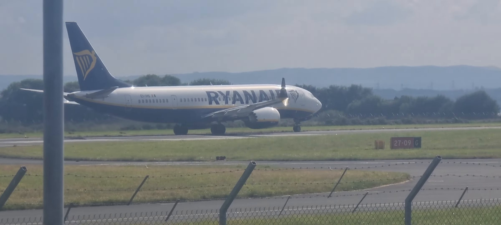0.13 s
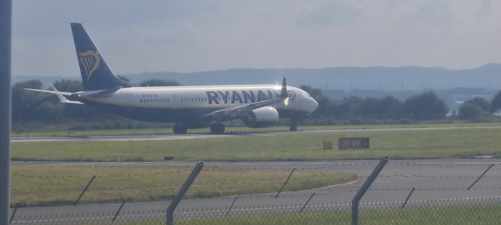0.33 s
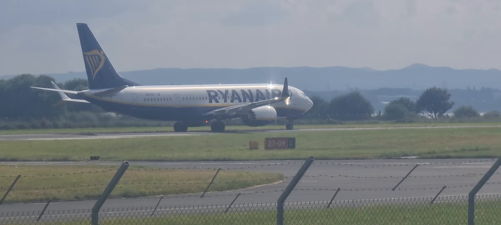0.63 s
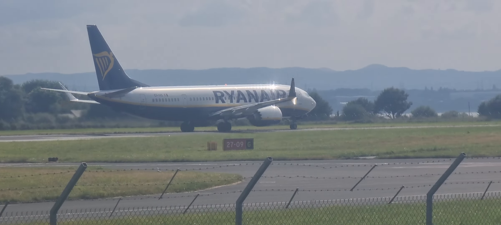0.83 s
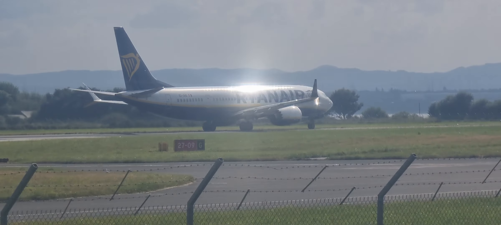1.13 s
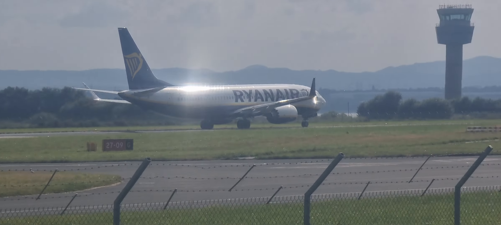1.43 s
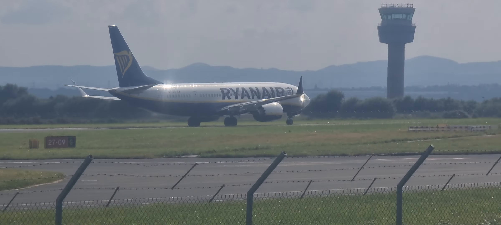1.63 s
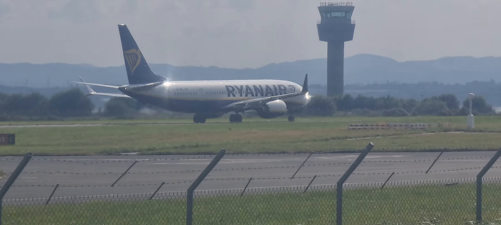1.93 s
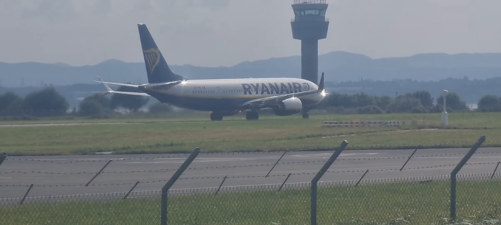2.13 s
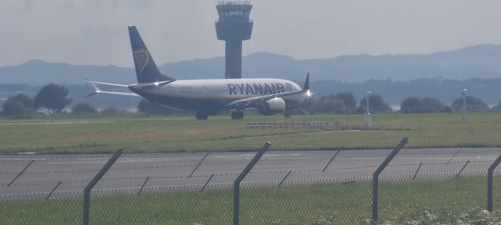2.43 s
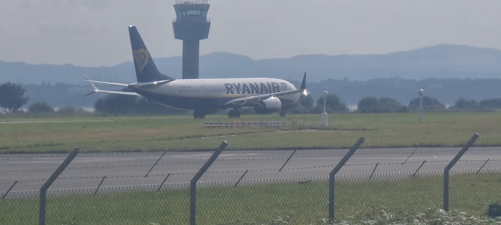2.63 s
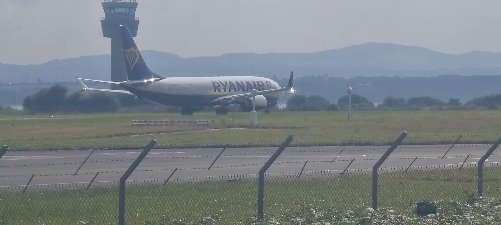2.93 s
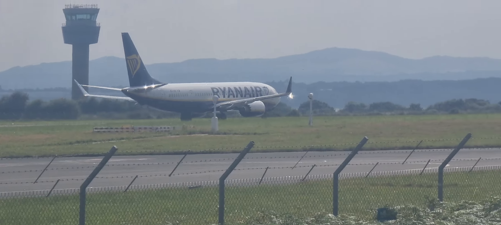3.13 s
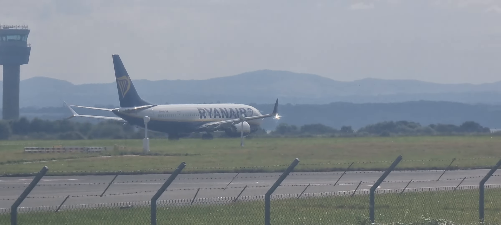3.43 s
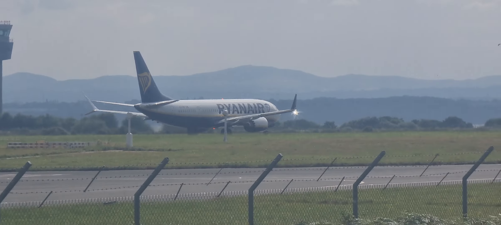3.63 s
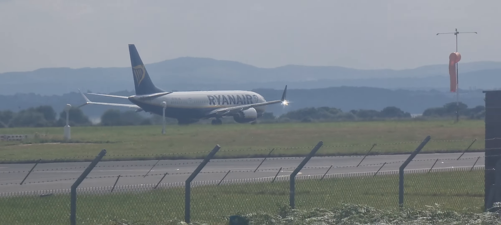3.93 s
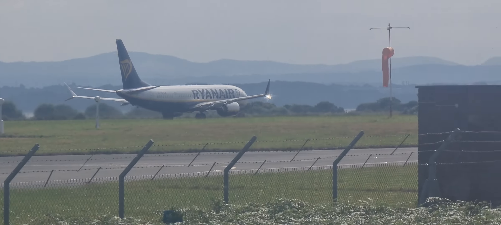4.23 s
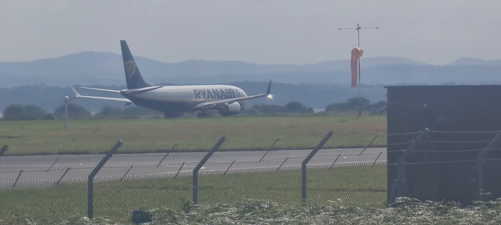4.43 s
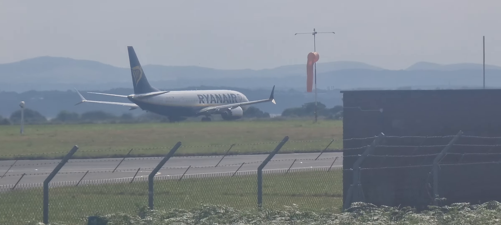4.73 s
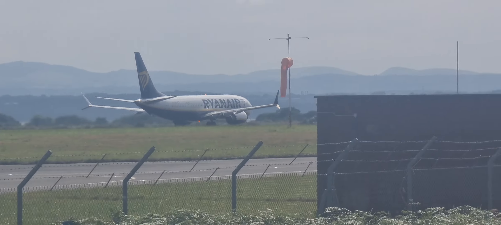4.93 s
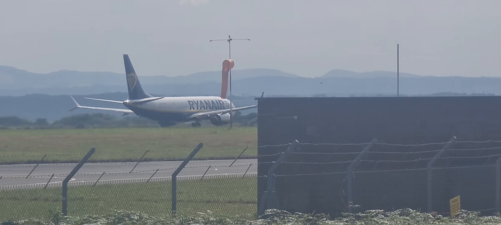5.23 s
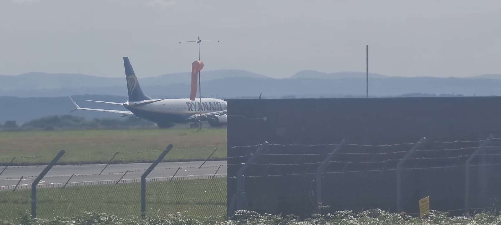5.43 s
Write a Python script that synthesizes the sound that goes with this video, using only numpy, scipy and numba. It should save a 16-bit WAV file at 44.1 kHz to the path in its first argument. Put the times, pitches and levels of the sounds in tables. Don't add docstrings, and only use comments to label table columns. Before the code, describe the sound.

A jet airliner's deep, tearing roar fades down a runway, with a faint airy whine, three small button clicks with thumps, and late wind knocks.

```python
import sys
import numpy as np
from scipy import signal
from scipy.fft import rfft, irfft, next_fast_len
from scipy.io import wavfile
from scipy.ndimage import uniform_filter1d, minimum_filter1d
from numba import njit

SR = 44100
rng = np.random.default_rng(int(sys.argv[2]) if len(sys.argv) > 2 else 0)


def wav_out(sig):
    wavfile.write(sys.argv[1], SR, np.round(np.clip(np.atleast_2d(sig).T, -1, 1) * 32767).astype(np.int16))


def invert_db(x):
    u = np.asarray(x, float) / 20
    return 10 ** u


N = 246519

# press_s, press_tick_db, held_s, release_rattle_db, thump_db
BUTTON_PRESSES = [
    (1.2322, -42, .157, -41.5, 10),
    (2.1227, -41.5, .135, -44, 12.5),
    (3.5026, -52, .155, -39, 10.5),
]


def colour(table, hz):
    at, value = np.transpose(table)
    return np.interp(np.log(hz), np.log(at), value)


def bumps(rows):
    t = np.arange(N) / SR
    return sum(db * np.exp(-2 * ((t - s) / (length / 2)) ** 2) for s, length, db in rows)


def walk(rate_hz):
    hold = int(SR / rate_hz)
    steps = np.repeat(rng.standard_normal(N // hold + 1), hold)
    x = uniform_filter1d(uniform_filter1d(steps, hold), hold)[:N]
    return x / x.std()


def engines():
    # pitch_hz, level_db_per_hz
    roar_spectrum = [(60, -65.5), (130, -46), (250, -46), (700, -44), (1500, -56), (3000, -56),
                     (4500, -66.5), (5600, -69.5), (6500, -80.5), (7600, -93), (8300, -104), (9400, -106),
                     (10500, -130)]
    roar_centres = [280, 900, 2500, 4500]
    size = next_fast_len(N)
    hz = np.arange(1, size // 2 + 2) * SR / size
    swell_db = swells()
    noise = rfft(rng.standard_normal((3, size)))
    source = noise * invert_db(colour(roar_spectrum, hz)) * np.sqrt(SR / 2)
    centres = 140 * 2 ** np.arange(0, 6, .4)
    shimmer = walk(14)
    plume = invert_db(swell_db[0]) * rumble() + whine()
    for k, centre in enumerate(centres):
        band = np.sqrt(colour(np.c_[centres, np.arange(len(centres)) == k], hz))
        shares = [colour(np.c_[roar_centres, row], centre) for row in np.eye(len(roar_centres))]
        treble = np.clip(centre / 2500, 0, 1)
        flicker_db = treble * (0.5 * shimmer + 1.37 * walk(14)) + 0.93 * walk(2.663)
        plume = plume + invert_db(shares @ swell_db[1:] + flicker_db) * irfft(source * band, size)[:, :N]
    return camera_body(plume, size, hz)


def swells():
    # time_s, level_db
    plume_level = [(0, -12), (.3, -11.5), (.55, -14), (.85, -14), (1.15, -18.5), (1.5, -15), (1.8, -15),
                   (2.05, -16.5), (2.25, -16.5), (2.45, -19.5), (2.85, -18.5), (3.2, -20), (3.45, -19),
                   (3.75, -26), (3.95, -24), (4.5, -27.5), (5.1, -27), (5.59, -26.5)]
    # centre_s, length_s, level_db
    air_patches = [(.15, 0.7, -2.5), (.28, 0.049, -6.5), (.42, 0.057, -6.5), (.51, 0.059, 3),
                   (.58, .04, -7), (.86, 0.027, -3), (.93, 0.096, 4.5), (1.12, 0.17, 8.5), (1.2, .09, 4),
                   (1.38, 0.055, 1.5), (1.5, 0.12, -1.5), (1.66, 0.17, 4), (2.0, 0.23, -3),
                   (2.22, 0.2, 2.5), (2.55, 0.36, 2.5), (2.9, 0.032, -8), (2.99, 0.088, 4.5),
                   (3.19, 0.056, -1.5), (3.3, 0.092, 2.5), (3.36, 0.059, -4.5), (3.47, .06, 2.5),
                   (3.75, 0.076, 1.5), (4.17, 0.49, 4), (4.5, 0.29, -1.5), (4.76, .06, 2), (4.99, .08, 0.5),
                   (5.08, .18, 5.5), (5.4, 0.55, -3.5)]
    # plume_share, air_share, drift_db_per_s
    band_answers = [(0.49, 0.49, -2.5), (1.105, 0.18, 0.18), (0.85, 1.38, 0.5), (0.53, .9, -1.13)]
    # centre_s, length_s, level_db
    eddy_surges = [(.2, 0.5, 2.5), (.54, 0.054, -7.5), (.72, 0.16, 2.5), (.88, 0.033, -6.5),
                   (1.03, 0.088, 2), (1.2, .1, -3), (1.6, 0.041, 7), (1.79, 0.083, 0.5), (1.96, .06, 1.5),
                   (2.05, 0.057, -3.5), (2.27, 0.11, -10), (2.6, .4, 0.5), (2.9, .03, -1), (2.98, 0.07, 2),
                   (3.19, 0.067, -5), (3.3, 0.1, 8), (3.37, .05, -5.5), (3.48, 0.055, 9), (3.7, .2, -5.5),
                   (4.05, 0.44, 3), (4.22, .08, 7.5), (4.58, 0.074, -4.5), (4.72, 0.067, 8),
                   (4.83, .05, 2.5), (4.91, 0.083, -8), (5.08, 0.099, 5), (5.22, 0.07, -6.5),
                   (5.36, .06, -1.5), (5.44, 0.054, -8.5), (5.56, .06, 6)]
    t = np.arange(N) / SR
    plume = np.interp(t, *np.transpose(plume_level))
    air = bumps(air_patches)
    rumble_db = -1.65 * t + bumps(eddy_surges)
    db = np.array([rumble_db] + [a * plume + b * air + c * t for a, b, c in band_answers])
    return db - 10 * np.log10(np.mean(invert_db(2 * db), axis=1, keepdims=True))


def rumble():
    # pitch_hz, level_db_per_hz
    eddy_spectrum = [(12, -60), (25, -36.5), (40, -31), (58, -22), (75, -22.5), (100, -28.5), (118, -34),
                     (150, -60), (220, -98), (600, -140), (2000, -190)]
    size = next_fast_len(N + N // 4)
    hz = np.arange(1, size // 2 + 2) * SR / size
    noise = rfft(rng.standard_normal((3, size)))
    eddies = irfft(noise * invert_db(colour(eddy_spectrum, hz)) * np.sqrt(SR / 2), size)
    place = np.cumsum(np.linspace(1.1, .9, N))
    return np.array([np.interp(place, np.arange(size), row) for row in eddies])


def whine():
    # pitch_hz, width_hz, level_db
    fan_tones = [(1647, 270, -1), (2250, 270, 5), (1280, 220, 1.3), (1024, 81, 1.1)]
    # centre_s, length_s, level_db
    fan_beams = [
        [(.5, .1, 18.5), (1.42, 0.08, 13.5), (1.7, .2, 7), (2.22, .12, 23.5), (2.9, 1, 14.5), (3.4, 0.27, 9.5),
         (3.9, 1, 16), (4.4, 0.37, 5.5)],
        [(.9, .6, 12.5), (1.42, 0.072, 4.5), (1.68, .25, 10.5), (2.35, 0.41, 14.5), (2.8, 1, 14.5),
         (5.05, 0.2, 19), (5.45, .4, -9)],
        [(.95, .4, 9), (2.26, 0.25, 20)],
        [(1.75, 0.78, 12.5), (2.2, 0.5, 15.5), (5.2, 0.7, 10.5)],
    ]
    base_levels_db, fade_db_per_s = (-38, -41.5, -40.5, -39.5), -1.3
    t, hz, out = np.arange(N) / SR, np.arange(N // 2 + 1) * SR / N, 0
    for (centre_hz, width_hz, db), base_db, beams in zip(fan_tones, base_levels_db, fan_beams):
        smear = np.exp(-2 * ((hz - centre_hz) / width_hz) ** 2)
        tone = irfft(rfft(rng.standard_normal((3, N))) * smear, N)
        out = out + tone / tone.std() * invert_db(db + base_db + fade_db_per_s * t + bumps(beams))
    return out


def housing(table, hz):
    out = 1
    for centre_hz, width_hz, db in table:
        s, a, k = 1j * hz / centre_hz, invert_db(db / 2), width_hz / centre_hz
        out = out * (s * s + s * k * a + 1) / (s * s + s * k / a + 1)
    return out


def camera_body(plume, size, hz):
    # pitch_hz, width_hz, level_db
    left_port = [(474, 105, -14.5), (753, 100, 4.5), (903, 115, -5), (1030, 50, 4.5), (1338, 192, 8),
                 (1497, 185, -8), (1660, 158, 7), (1983, 445, -20), (2220, 70, 6), (3000, 84, 3),
                 (3300, 553, -26.5), (3700, 130, -10), (4160, 248, 5), (4420, 404, -10), (4667, 227, -7.5),
                 (5450, 459, 7), (5850, 650, -7)]
    # pitch_hz, width_hz, level_db
    right_port = [(528, 161, -13), (1074, 104, -5.5), (1317, 446, 11.5), (1394, 63, -10), (1644, 250, 7.5),
                  (1958, 604, -20.5), (2360, 92, -5.5), (2950, 230, 5), (3143, 110, -14),
                  (3388, 160, -14.5), (3520, 120, 9), (3637, 140, -5.5), (4087, 424, 14.5),
                  (4388, 466, -10), (4540, 62, -1.5), (4900, 248, 7.5), (5400, 102, 3), (5800, 260, -4)]
    # pitch_hz, left_minus_right_db
    left_shade = [(250, -1), (700, 2), (1500, 8), (3000, 8), (4500, -3.5), (5600, -11.5), (6500, -16.5),
                  (7600, -20)]
    # pitch_hz, left_lead_radians
    left_lead = [(50, .42), (1100, 0), (1800, -2), (2150, -4.7), (2500, -2.2), (3000, .1), (3280, 3.1),
                 (3620, 0), (3850, 3.9), (4350, 3.4), (4540, 8.4), (4950, 4.2), (5800, 3.6), (6600, -1.5)]
    # pitch_hz, power_share (0-1)
    scatter_share = [(70, .015), (160, .16), (320, .04), (500, .07), (1000, .06), (2000, .03), (3000, .05),
                     (4000, .08), (5300, .09), (7000, .4)]
    direct, *scattered = rfft(plume, size)
    ports = np.array([housing(left_port, hz), housing(right_port, hz)])
    diffuse = colour(scatter_share, hz)
    share = diffuse / (diffuse + np.abs(ports))
    direct = direct * np.array([np.exp(1j * colour(left_lead, hz)), np.ones(len(hz))])
    heard = ports * (np.sqrt(1 - share) * direct + np.sqrt(share) * np.array(scattered))
    heard[0] *= invert_db(colour(left_shade, hz))
    return irfft(heard, size)[:, :N]


def duck():
    drop_db, lag_s, recover_s = -6.5, 0.0064, 0.075
    t = np.arange(N) / SR
    late = [np.clip(t - row[0] - lag_s, 0, None) for row in BUTTON_PRESSES]
    return invert_db(drop_db * sum((1 - np.exp(-x / .002)) * np.exp(-x / recover_s) for x in late))


def button():
    # pitch_hz, level_db
    tick_spectrum = [(300, 19.5), (1500, 20.5), (4000, 13), (8000, 4.5), (13000, -1), (15500, -13.5)]
    gap_s, rise_db, scatter_db = 0.0053, 1, 3.5
    t, crack = np.arange(N) / SR, 0
    before = np.arange(7)
    ticks = [row[:2] for row in BUTTON_PRESSES]
    for s, _, held_s, db, _ in BUTTON_PRESSES:
        slip, size = rng.standard_normal((2, len(before)))
        tick_s = s + held_s - gap_s * before * (1 + 0.044 * slip)
        tick_db = db - rise_db * before + scatter_db * size * (before > 0)
        ticks += zip(tick_s, tick_db)
    for s, db in ticks:
        near = np.clip(t - s, -.02, .05)
        snap = np.exp(-near / .001) * (near > 0)
        rasp = .25 * np.exp(-(near / .0025) ** 2)
        crack = crack + invert_db(db) * (snap + rasp)
    mid, side = rng.standard_normal((2, N))
    left_right = np.array([[1], [-1]])
    pair = crack * (mid + .35 * side * left_right) * invert_db(left_right)
    return irfft(rfft(pair) * invert_db(colour(tick_spectrum, np.arange(1, N // 2 + 2) * SR / N)), N)


def knocks():
    # start_s, first_hz, peak_db, left_minus_right_db
    gust_blows = [
        (4.525, 331, 5, 7.5),
        (4.676, 163, 7, 6),
        (4.698, 170, 5, 11),
        (4.712, 169, 5.5, 12),
        (4.726, 160, 7.5, 21),
        (4.826, 260, -11.5, 15),
        (5.221, 284, 1.7, 26),
    ]
    out, t = np.zeros((2, N)), np.arange(int(.2 * SR)) / SR
    # start_s, first_hz, last_hz, t60_s, peak_db, left_minus_right_db
    blows = [(row[0] + .002, 71.6, 55.7, 0.046, row[4], 6) for row in BUTTON_PRESSES]
    blows += [(s, first_hz, 92, 0.031, db, pan_db) for s, first_hz, db, pan_db in gust_blows]
    for s, first_hz, last_hz, t60_s, db, pan_db in blows:
        hz = last_hz + (first_hz - last_hz) * np.exp(-t / 0.0058)
        envelope = (1 - np.exp(-t / 0.0055)) * np.exp(-np.log(1000) * (t / t60_s) ** 2)
        swing = -np.sin(2 * np.pi * np.cumsum(hz) / SR) * envelope
        start = int(s * SR)
        out[:, start:start + len(t)] += swing * invert_db(db - np.array([[0], [pan_db]]))
    return out


def grass():
    # centre_s, length_s, level_db
    breezes = [
        (.37, .3, 3.5),
        (2.65, .4, 7.5),
        (3.0, .4, 6.5),
        (5.15, .45, 8),
    ]
    level_db, fade_db_per_s, stir_db = -69, -1.1, .6
    highpass = signal.butter(4, 7500, "high", fs=SR, output="sos")
    rustle = signal.sosfilt(highpass, rng.standard_normal((2, N)))
    fade_db = fade_db_per_s * np.arange(N) / SR
    return rustle * invert_db(level_db + fade_db + bumps(breezes) + stir_db * walk(11))


def scene():
    drive_db = -0.5
    return engines() * invert_db(drive_db) * duck() + button() + knocks() + grass()


@njit
def release(need, step):
    g, out = 1., np.empty(len(need))
    for i in range(len(need)):
        g = min(need[i], g + (1 - g) * step)
        out[i] = g
    return out


def low_pass(x):
    return signal.sosfilt(signal.butter(12, 15800, fs=SR, output="sos"), x)


def record(dry):
    ceiling, ahead, release_s = .89, 96, 0.023
    need = ceiling / np.maximum(np.abs(dry).max(axis=0), ceiling)
    gain = release(minimum_filter1d(need, size=2 * ahead + 1), 1 / (release_s * SR))
    held = dry * signal.fftconvolve(gain - 1, np.hanning(2 * ahead) / ahead, "same") + dry
    return low_pass(held)


dry = scene()
out = record(dry)
wav_out(out)
```